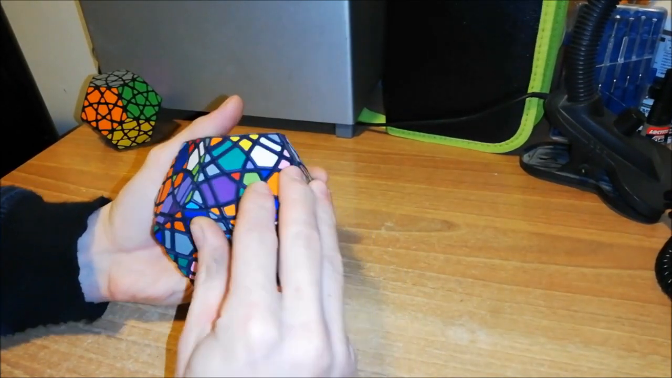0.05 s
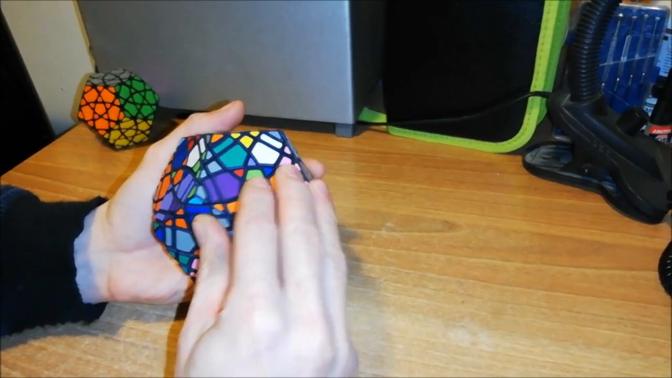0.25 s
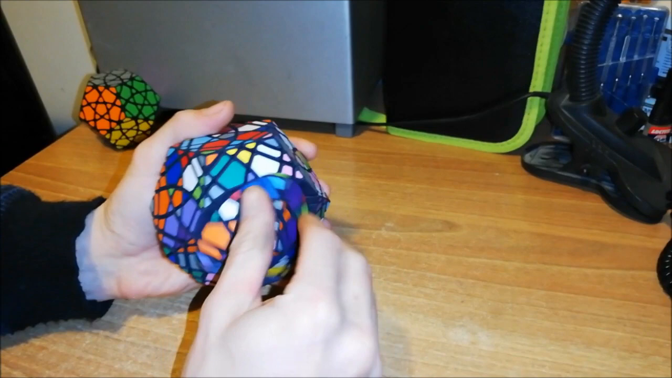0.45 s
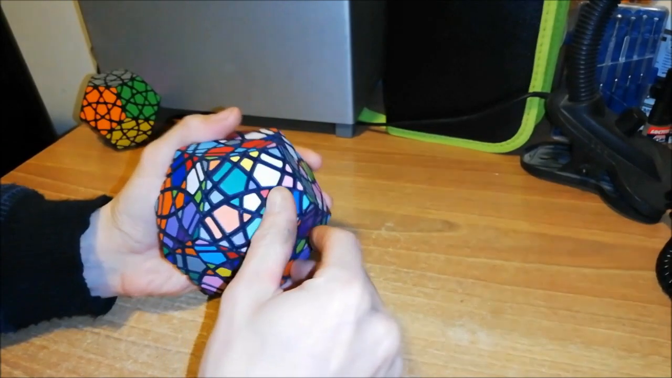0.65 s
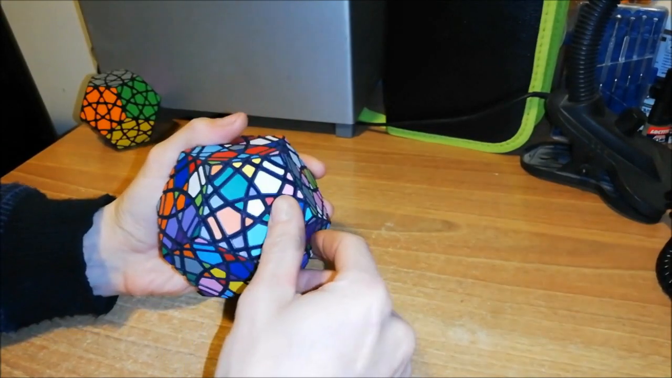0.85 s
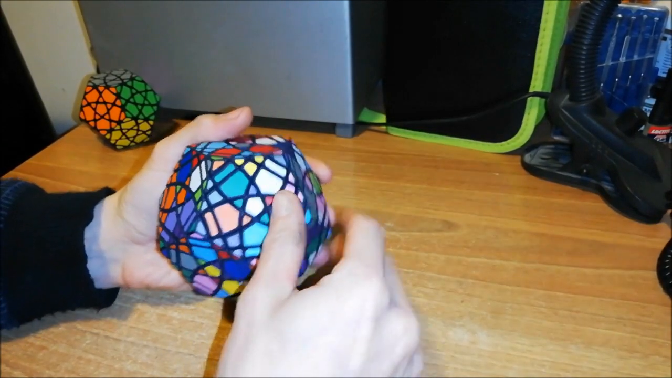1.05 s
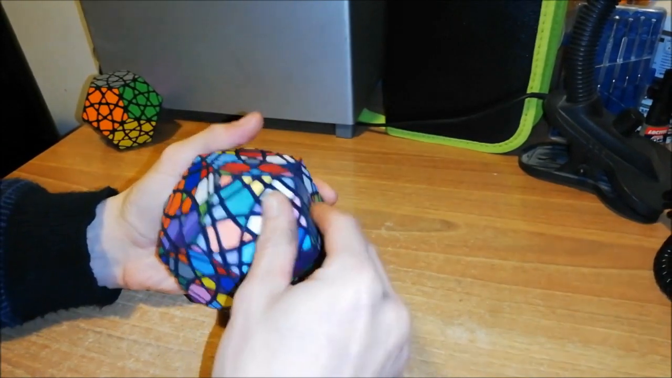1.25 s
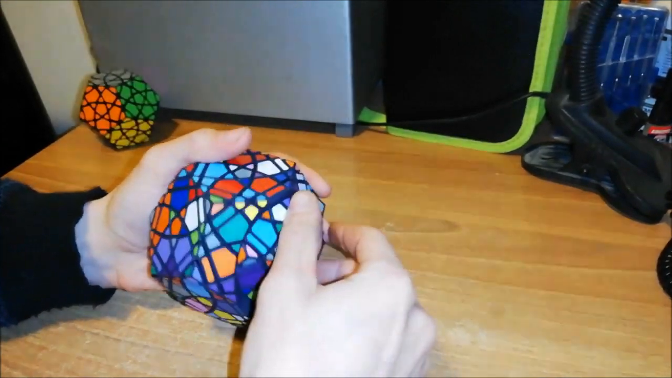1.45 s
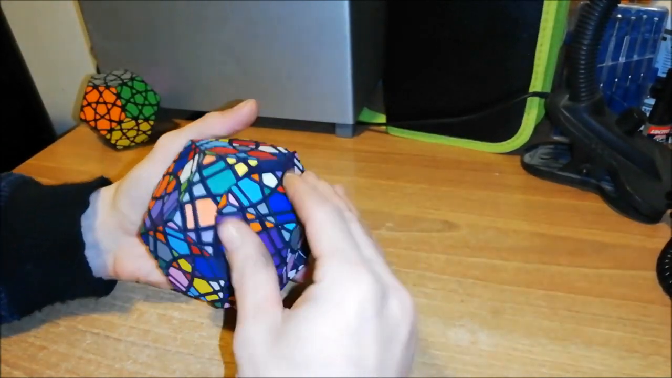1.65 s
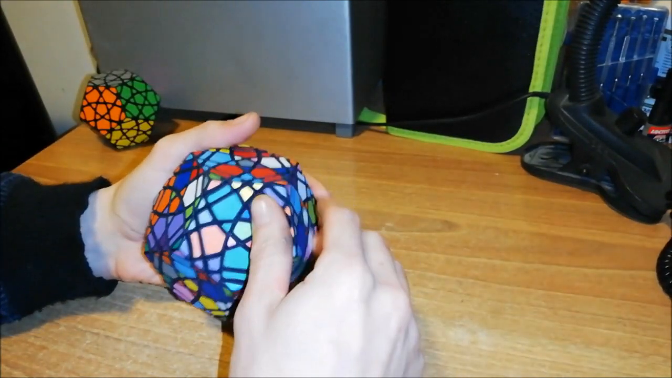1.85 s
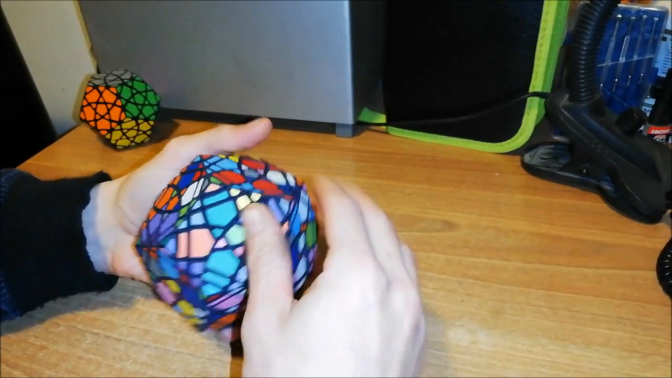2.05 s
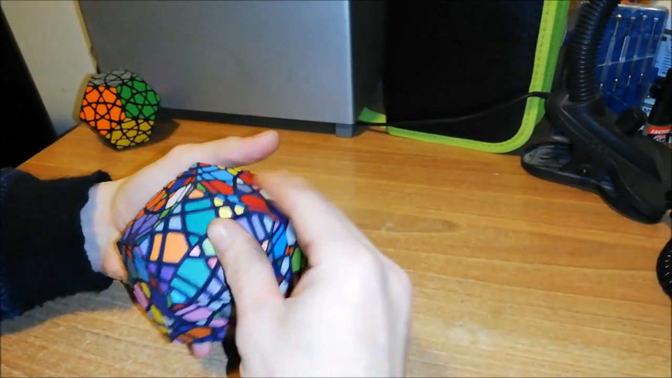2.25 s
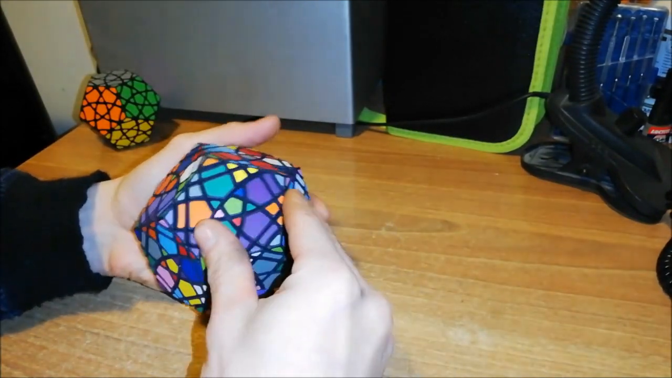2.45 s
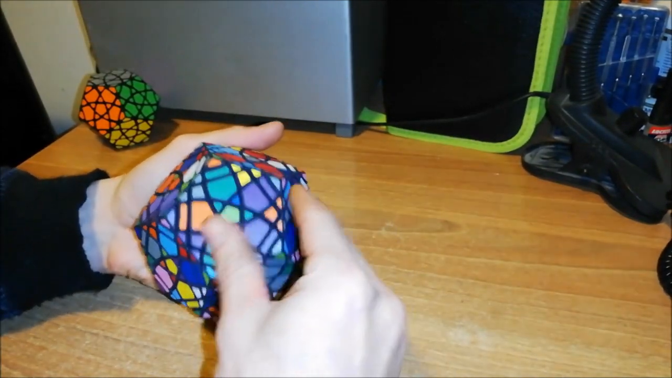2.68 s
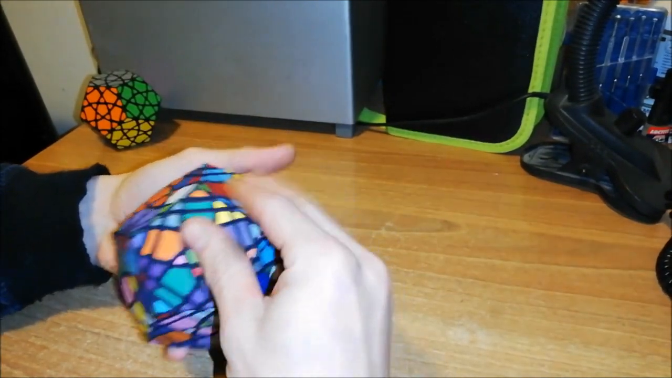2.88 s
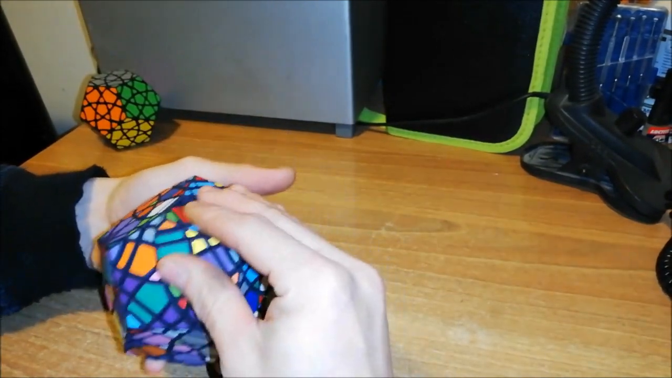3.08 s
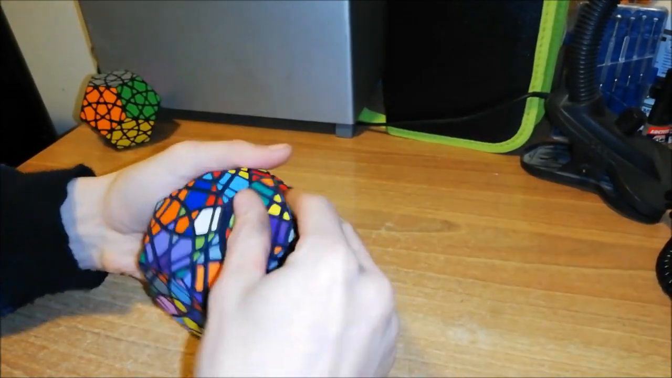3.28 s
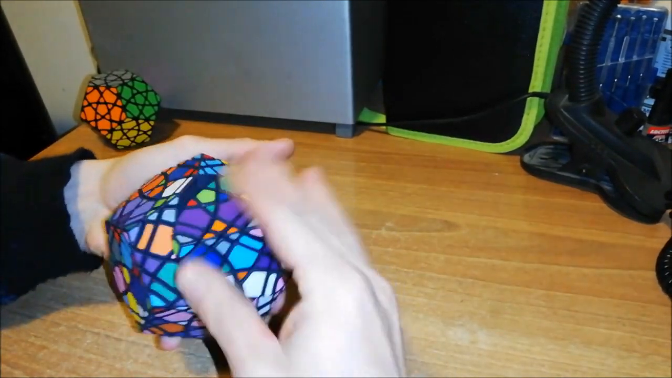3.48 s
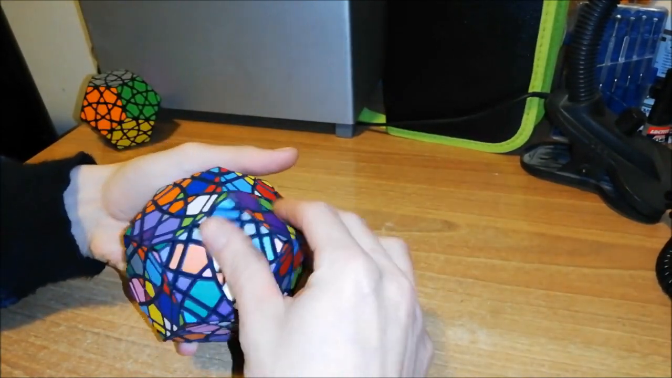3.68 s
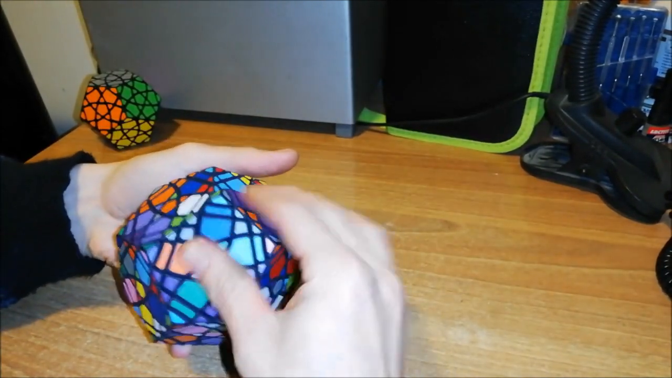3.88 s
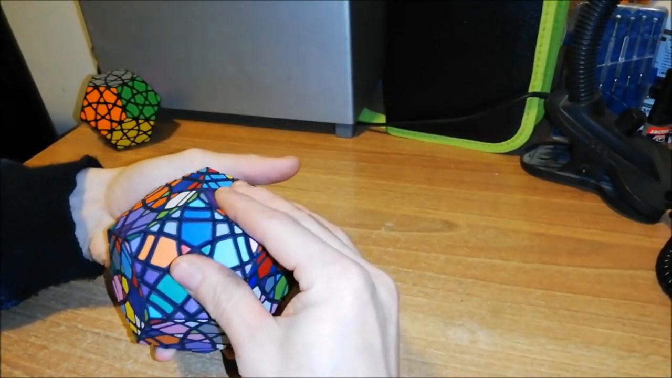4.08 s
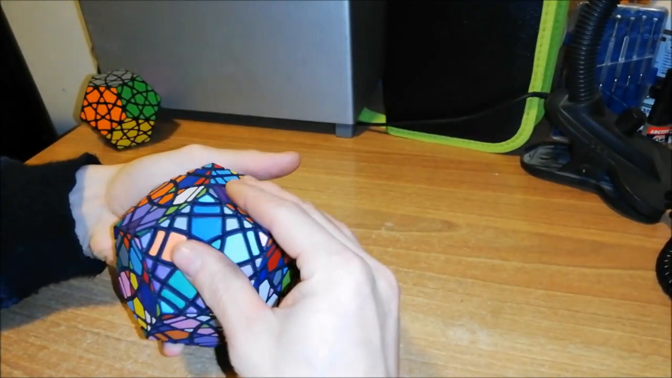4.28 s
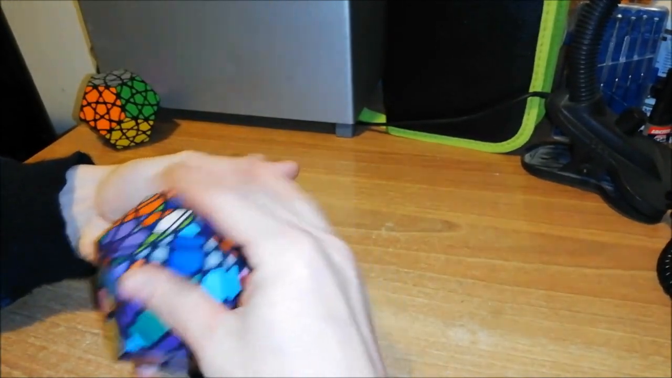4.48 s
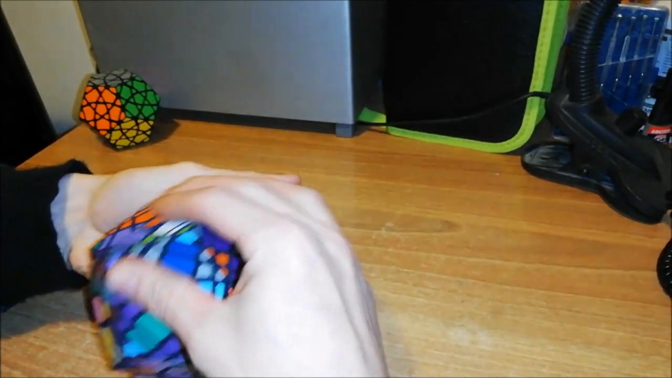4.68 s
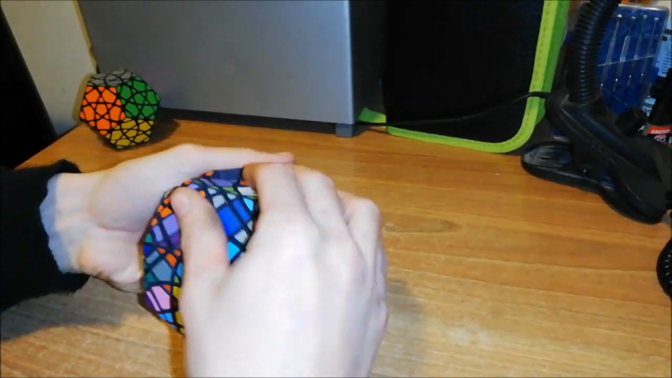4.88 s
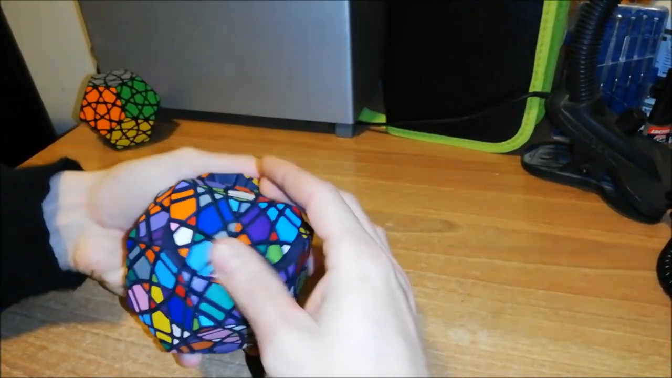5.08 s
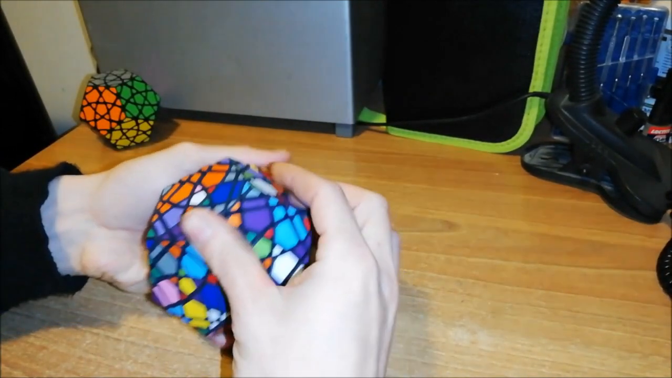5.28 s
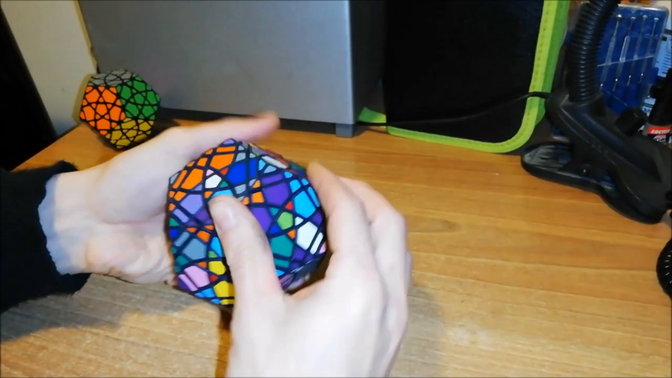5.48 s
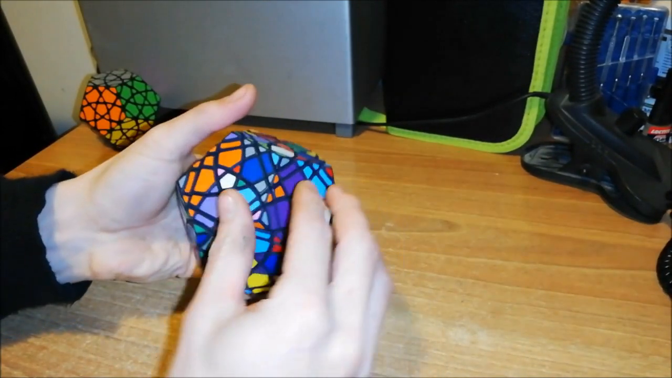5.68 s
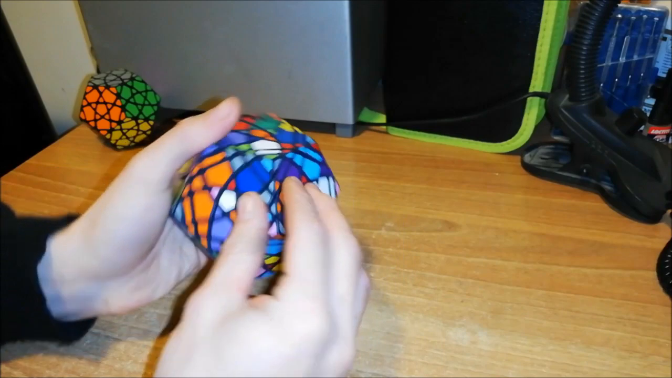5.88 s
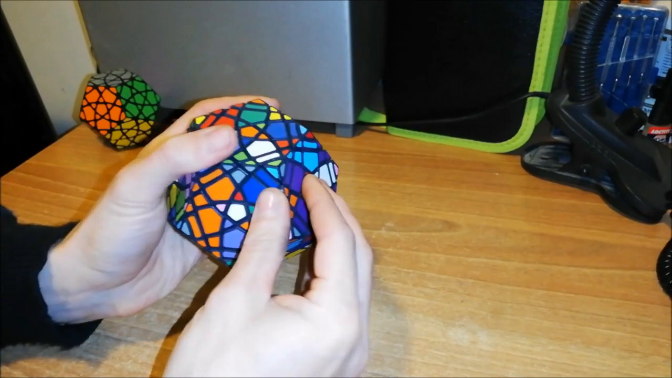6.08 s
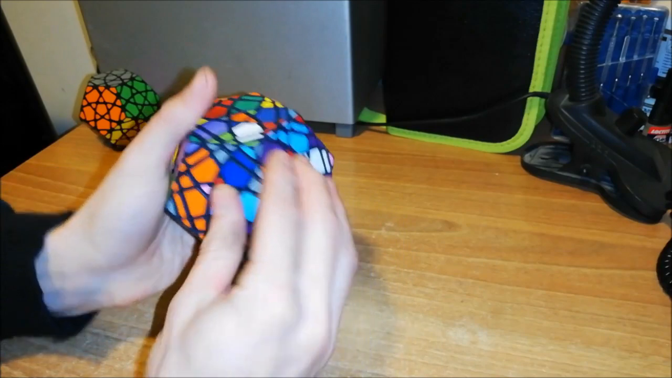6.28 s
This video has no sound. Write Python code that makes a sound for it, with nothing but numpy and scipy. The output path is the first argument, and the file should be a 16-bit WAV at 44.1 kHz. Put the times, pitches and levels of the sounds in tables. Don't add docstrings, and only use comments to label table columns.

```python
import sys
import numpy as np
from scipy import signal
from scipy.fft import rfft, irfft
from scipy.io import wavfile
from scipy.ndimage import uniform_filter1d

SR = 44100
rng = np.random.default_rng(int(sys.argv[2]) if len(sys.argv) > 2 else 0)


def attenuation_scalar(level_db):
    decades = np.asarray(level_db, float) / 20
    return 10 ** decades


def unload_audio(sound):
    columns = np.transpose(np.atleast_2d(sound))
    steps = np.round(np.clip(columns, -1, 1) * 32767)
    wavfile.write(sys.argv[1], SR, steps.astype(np.int16))


N = 279456
LAG_S = 7 / SR


def evened(x):
    return x / np.sqrt(np.mean(x ** 2) + 1e-20)


def read(points, hz):
    f, value = np.transpose(points)
    return np.interp(np.log(hz + 1), np.log(f + 1), value)


def modes(hz, table):
    power = 0
    for f, width_hz, db in table:
        detune = (hz - f ** 2 / (hz + 1)) / width_hz
        power = power + attenuation_scalar(db) ** 2 / (1 + detune ** 2) ** 2
    return np.sqrt(power)


def paired(a, b, same, lag, gain):
    hz, a, b = np.fft.rfftfreq(N, 1 / SR), rfft(a), rfft(b)
    share = np.clip(read(same, hz), -1, 1)
    right = (share * a + np.sqrt(1 - share ** 2) * b) * np.exp(-1j * lag(hz))
    return evened(irfft(np.array([a, right]) * gain(hz), N))


def hump(s, db, rise_s, fall_s):
    t = np.arange(N) / SR - s
    return attenuation_scalar(np.maximum(db - 20 * (t / np.where(t < 0, rise_s, fall_s)) ** 2, -200))


def hiss():
    # frequency in Hz, level in dB per Hz.
    spectrum = [(2.4, -23), (4.0, 6), (16, -3.5), (22, -10.5), (97, -9.5), (275, -13.5), (316, -19),
                (447, -15), (726, -18.5), (863, -20), (1260, -16.5), (1560, -18.5), (6230, -23),
                (15900, -29)]
    # frequency in Hz, correlation.
    same = [(40, 0.9), (60, 0.88), (120, 0.75), (240, 0.099), (480, -0.7), (950, -0.23), (1890, 0.21),
            (3770, -0.035), (7520, 0.18), (15000, -0.046)]
    a, b = rng.standard_normal((2, N))
    return attenuation_scalar(-65) * paired(a, b, same, lambda hz: 0, lambda hz: attenuation_scalar(read(spectrum, hz)))


def slips():
    slips_per_s, spread_db, clump_db, piece_q = 450, 2.5, 2, 9.7
    grit_per_s, grit_db = 630, -9.5
    out = np.zeros(N)
    for hz in np.geomspace(250, 16000, num=40):
        count = int(slips_per_s * np.sqrt(hz / 1000) * N / SR)
        when, size, sign = rng.random((3, count))
        clumps = np.interp(when, np.linspace(0, 1, 300), rng.standard_normal(300))
        uneven_db = spread_db * (min(hz, 7e7 / hz) / 3000) ** 0.16
        jolts = np.zeros(N)
        size_db = clump_db * clumps - uneven_db * np.log(size + 0.0037)
        jolts[(when * N).astype(int)] = attenuation_scalar(size_db) * np.sign(sign - 0.5)
        out += np.sqrt(hz) * evened(signal.lfilter(*signal.iirpeak(hz, piece_q, SR), jolts))
    chance, size = rng.random(N), rng.standard_normal(N)
    return evened(out) + attenuation_scalar(grit_db) * evened(size * (chance < grit_per_s / SR))


def voices():
    # frequency in Hz, width in Hz, level in dB.
    cavity = [
        [(717, 223, 0), (1020, 230, -3.5)],
        [(776, 340, -3.5), (1040, 470, -0.5), (1485, 1100, -7.5)],
    ]
    # frequency in Hz, level in dB per Hz.
    surface = [(760, -14.5), (1300, -15), (1820, -3.5), (2080, -2.5), (2730, -1.5), (3410, 0.5), (3950, -1),
               (4470, -0.5), (6390, -4), (7630, -4.5), (9710, -5.5), (14500, -19.5), (15900, -20)]
    # frequency in Hz, width in Hz, level in dB.
    edge_modes = [(9280, 2800, 0)]
    # frequency in Hz, width in Hz, level in dB.
    palm_modes = [(357, 190, 0)]
    # frequency in Hz, left minus right in dB.
    balance = [(60, -4), (110, 10), (200, 5), (380, 19), (700, 34), (1290, 7.5), (2380, 4), (4400, 1.5),
               (8120, 3), (15000, -2)]
    # frequency in Hz, correlation.
    same = [(350, .7), (600, .8), (760, .6), (1000, .9), (1600, .35), (2400, .55), (3300, .25), (12000, .2)]
    # frequency in Hz, right side lag in radians.
    twist = [(250, .3), (600, 1.4), (700, 2.1), (780, 3.9), (870, 5.4), (1000, 5.75), (1400, 2 * np.pi)]

    def lean(hz):
        return attenuation_scalar(np.outer([0.5, -0.5], read(balance, hz)))

    def lag(hz):
        return 2 * np.pi * hz * LAG_S + read(twist, hz)

    def cut(hz, low_hz):
        return 1 / np.sqrt(1 + (low_hz / (hz + 1)) ** 6)

    def hollow(hz):
        return np.array([modes(hz, side) for side in cavity]) * cut(hz, 417)

    def faces(hz):
        return lean(hz) * attenuation_scalar(read(surface, hz)) * cut(hz, 1040)

    def edges(hz):
        return lean(hz) * modes(hz, edge_modes)

    def palm(hz):
        return modes(hz, palm_modes)

    a, b = slips(), slips()
    return np.array([paired(a, b, same, lag, colour) for colour in (hollow, faces, edges, palm)])


def push(s, db, build_s, build_db, stop_s):
    build_share = 0.81, 1.06, 0.93, 0.69
    stop_share = 1.12, 1.2, 1.86, 0.45
    break_db_per_s, stop_db, stop_bend = 722, 29, 1.6
    t = np.arange(N) / SR - s
    rise_db = np.outer(build_share, build_db * np.clip(t / build_s, -1, 0))
    break_db = break_db_per_s * np.minimum(t + build_s, 0)
    slow_db = np.outer(stop_share, stop_db * (np.maximum(t, 0) / stop_s) ** stop_bend)
    return attenuation_scalar(np.maximum(db + rise_db + break_db - slow_db, -200))


def turning(voice):
    # hardest push in seconds, rubbing in dB, build-up in seconds,
    # gain over the build-up in dB, slide to a stop in seconds.
    turns = [
        (0.496, -39.5, 0.074, 8.5, 0.19),
        (1.446, -41.5, 0.02, 1.5, 0.13),
        (1.873, -39, 0.025, 2.5, 0.14),
        (3.108, -53.5, 0.052, 6, 0.095),
        (3.353, -38.5, 0.11, 10.5, 0.097),
        (3.764, -40, 0.04, 2, 0.12),
        (4.914, -40.5, .14, 15.5, 0.09),
        (5.315, -46.5, 0.084, 2.5, 0.087),
    ]
    grip_db = [-1.5, 1, -.5, 1.5, -.5, -1, 1, 3]
    # peak in seconds, rubbing in dB, rise in seconds, fall in seconds, extra
    # drone in dB.
    nudges = [(0.068, -70, 0.12, 0.05, -2.5), (0.939, -60, .02, 0.041, 5),
              (1.378, -65.5, 0.028, 0.014, 6.5), (2.072, -75, 0.044, 0.025, 0.5),
              (2.478, -68.5, 0.055, 0.096, -3), (2.59, -66, 0.028, 0.1, 7.5), (2.988, -64, 0.018, 0.046, 2),
              (3.03, -63.5, 0.08, 0.031, -5), (3.46, -65, 0.099, 0.023, -4),
              (3.512, -66.5, 0.034, 0.034, -8), (3.672, -64, 0.021, 0.025, -4),
              (3.97, -68.5, 0.12, 0.21, -4), (4.1, -62.5, 0.042, 0.11, 4), (4.33, -73.5, 0.33, 0.24, -17),
              (4.61, -72, 0.066, 0.087, -0.5), (4.735, -71.5, 0.05, 0.027, 7),
              (4.99, -67.5, .04, 0.065, 0.5), (5.12, -72, .06, .06, 2), (6.07, -76, 0.27, 0.18, 1.5),
              (6.32, -78, 0.039, .06, -2)]
    # peak in seconds, rubbing in dB, rise in seconds, fall in
    # seconds, extra drone in dB.
    seams = [(0.365, -62.5, 0.018, .03, 8), (0.39, -49.5, 0.022, 0.037, 4), (0.57, -46.5, 0.025, 0.082, 2),
             (0.676, -59, 0.088, 0.028, 4.5), (1.485, -47, 0.061, 0.082, 0.5),
             (1.545, -57, .04, 0.024, 5.5), (1.839, -50, 0.03, 0.019, 3), (1.96, -59, 0.086, 0.036, 10.5),
             (3.706, -48, .015, 0.04, -1), (4.875, -49.5, 0.017, .1, 6), (3.388, -52, 0.046, .03, 5),
             (4.945, -56, .04, 0.014, 12), (5.24, -53.5, .02, 0.037, -1)]
    # peak in seconds, fizz in dB, rise in seconds, fall in seconds.
    glides = [(0.39, -49, .02, 0.02), (2.46, -60, 0.18, 0.039), (2.65, -65, 0.085, 0.036),
              (3.93, -68.5, 0.18, 0.092), (4.03, -65, .08, .12), (4.3, -78, .25, 0.12),
              (4.57, -71, 0.17, 0.06), (5.09, -68, 0.058, 0.055), (5.5, -79, .15, 0.13),
              (5.96, -71, 0.11, 0.29), (6.28, -71, 0.035, .08)]
    voice_db = -1, 3.5, -3, -30
    rest_db = -80.5, -75, -81, -82.5

    power = np.zeros((4, N))
    for row, drone_db in zip(turns, grip_db):
        power += (push(*row) * attenuation_scalar([[drone_db], [0], [0], [0]])) ** 2
    for s, db, rise_s, fall_s, drone_db in nudges + seams:
        power += (attenuation_scalar([[drone_db], [0], [-1.5], [8]]) * hump(s, db, rise_s, fall_s)) ** 2
    power = power * attenuation_scalar(np.array(voice_db)[:, None]) ** 2 + attenuation_scalar(np.array(rest_db)[:, None]) ** 2
    power[2] += sum(hump(*row) ** 2 for row in glides)
    return (voice * np.sqrt(power)[:, None]).sum(0)


def squeak():
    # time in seconds, frequency in Hz, level in dB.
    track = [
        (0.158, 309, -90),
        (0.174, 320, -70),
        (0.186, 308, -62),
        (0.21, 306, -97),
    ]
    s, hz, db = np.transpose(track)
    t = np.arange(N) / SR
    phase = 2 * np.pi * np.cumsum(np.interp(t, s, hz)) / SR
    gate = np.clip(np.minimum(t - s[0], s[-1] - t) / 0.011, 0, 1)
    return gate * np.sqrt(2) * attenuation_scalar(np.interp(t, s, db)) * np.sin(phase)


def ticks(voice):
    # start in seconds, tick peak in dB, hollow knock in dB, knock in Hz.
    edge_ticks = [(0.8764, -49, -58, 940), (0.9358, -35, -48.5, 1190), (0.947, -41, -74, 1210),
                  (1.3379, -49, -68, 990), (1.3748, -42, -58, 810), (1.4221, -24, -37.5, 1194),
                  (1.5973, -38, -65, 1120), (1.7933, -37.5, -55.5, 940), (2.4716, -35, -48.5, 1090),
                  (2.4772, -31.5, -54, 876), (2.5757, -50, -61, 1020), (2.6014, -65, -45, 950),
                  (2.59, -60, -57, 900), (2.622, -56, -47.5, 1040), (2.6528, -42, -67, 1080),
                  (3.5085, -55, -57, 980), (3.925, -59, -65, 982), (3.9694, -55, -64, 970),
                  (4.0813, -56, -58, 770), (4.772, -31, -63, 930), (5.2086, -42, -51, 904),
                  (5.2255, -49, -55, 1050), (5.4412, -47, -64, 905), (5.615, -70, -63, 1150),
                  (5.9786, -63, -63, 845), (6.0574, -46, -60.5, 944), (6.067, -45, -67, 1020),
                  (6.077, -58, -77, 1000)]
    # start in seconds, tick peak in dB, ring in Hz, hollow knock in dB,
    # knock in Hz.
    face_ticks = [(0.36, -55, 3700, -55.5, 946), (1.3194, -59, 4930, -61, 1110),
                  (1.3585, -48, 3280, -58, 960), (1.7654, -59, 4300, -68, 885),
                  (2.074, -51, 4390, -65, 1160), (2.759, -55, 4680, -61, 1090),
                  (2.9856, -41, 4900, -52.5, 662), (2.9873, -40, 3500, -52, 1500),
                  (2.988, -43, 2300, -52, 1057), (3.6609, -48, 3400, -56, 906),
                  (4.0273, -38, 4950, -77, 1010), (5.5375, -64, 3000, -60.5, 940),
                  (5.582, -67, 4590, -69, 960), (5.8443, -63, 3210, -66, 1110),
                  (6.3068, -59, 5050, -63.5, 1020), (6.328, -60, 5000, -69, 1010),
                  (1.8342, -36, 4000, -48, 1010), (3.572, -59, 4000, -62, 950),
                  (4.724, -52, 3520, -73, 900), (4.945, -40, 4470, -42, 955)]
    # start in seconds, tick peak in dB, ring in Hz,
    # hollow knock in dB, knock in Hz.
    snaps = [
        (4.0265, -29, 9100, -60, 1060),
        (5.9256, -34, 9000, -69, 920),
    ]
    tick_t60_s, snap_t60_s, snap_lean_db = 0.016, 0.009, 9

    rings_hz = 9300 * (1 + 0.04 * rng.standard_normal(len(edge_ticks)))
    rows = [(s, db, hz, tick_t60_s, 0, *knock) for (s, db, *knock), hz in zip(edge_ticks, rings_hz)]
    rows += [(s, db, hz, tick_t60_s, 0, *knock) for s, db, hz, *knock in face_ticks]
    rows += [(s, db, hz, snap_t60_s, snap_lean_db, *knock) for s, db, hz, *knock in snaps]

    hollow, face, edge = np.pad(voice[:3], ((0, 0), (0, 0), (0, SR)))
    out, t = np.zeros(face.shape), np.arange(SR // 8) / SR
    late = t - np.array([[0], [LAG_S]])
    for s, db, hz, t60_s, lean_db, knock_db, knock_hz in rows:
        at = slice(round(s * SR), round(s * SR) + len(t))
        fall = attenuation_scalar(db - 8 - 60 * t / t60_s) * np.minimum(t / 0.0004, 1)
        onset = np.sin(np.minimum(t / 0.0006, 1) * np.pi / 2) ** 2
        ring = np.sin(2 * np.pi * hz * late) * onset * attenuation_scalar(-60 * t / 0.014)
        crack = 0.35 * face[:, at] + 0.4 * edge[:, at] + 2.6 * ring
        out[:, at] += crack * fall * attenuation_scalar([[lean_db / 4], [-lean_db * 3 / 4]])
        knock_fall = attenuation_scalar(knock_db + 1.5 - 60 * t / 0.039) * np.minimum(t / 0.0024, 1)
        knock = 1.5 * np.sin(2 * np.pi * knock_hz * late) + 0.28 * hollow[:, at]
        out[:, at] += knock * knock_fall
    return out[:, :N]


def room(x):
    t60_s, echoes_per_s, first_s = 0.065, 6000, 0.002
    t = np.arange(SR // 4) / SR
    signs = rng.choice([-1.0, 1.0], (2, len(t)))
    present = rng.random((2, len(t))) < echoes_per_s / SR
    taps = signs * present * (t > first_s) * attenuation_scalar(-60 * t / t60_s)
    return signal.oaconvolve(x, taps / np.linalg.norm(taps[0]), axes=1)[:, :N]


def desk():
    # peak in seconds, hum in Hz, level in dB, rise in seconds, fall in seconds.
    drags = [
        (1.448, 134, -72.5, 0.036, 0.19),
        (2.868, 141, -53, 0.052, .035),
        (2.912, 145.5, -56.5, 0.016, 0.04),
        (2.979, 137, -65, 0.031, 0.048),
        (3.101, 137, -75, 0.035, 0.048),
    ]
    # frequency in Hz, width in Hz, level in dB.
    body = [(80, 61, 2.5), (152, 51, 3), (220, 120, -16), (335, 67, -8), (650, 120, -17)]
    overtone_db, rough_db = -14, -4
    t = np.arange(N) / SR
    noise = rfft(rng.standard_normal(N))
    rough = evened(irfft(noise * modes(np.fft.rfftfreq(N, 1 / SR), body), N))
    hum, level = np.zeros(N), np.zeros(N)
    for s, hz, db, rise_s, fall_s in drags:
        height = hump(s, db, rise_s, fall_s)
        phase = 2 * np.pi * hz * (t - s)
        hum += np.sqrt(2) * height * (np.sin(phase) + attenuation_scalar(overtone_db) * np.sin(2 * phase))
        level += height
    return hum + attenuation_scalar(rough_db) * rough * uniform_filter1d(level, 2500)


def scene():
    voice = voices()
    puzzle = turning(voice) + ticks(voice)
    echoes = attenuation_scalar(-13) * room(puzzle)
    return puzzle + echoes + desk() + squeak() + hiss()


def top_cut(x):
    return signal.sosfilt(signal.butter(12, 16040, fs=SR, output="sos"), x)


def record(dry):
    low_pass = signal.firwin(511, 15950, window=("kaiser", 9), fs=SR)
    mix = signal.oaconvolve(dry, low_pass[None], "same", axes=1)
    return top_cut(mix)


dry = scene()
out = record(dry)
unload_audio(out)
```